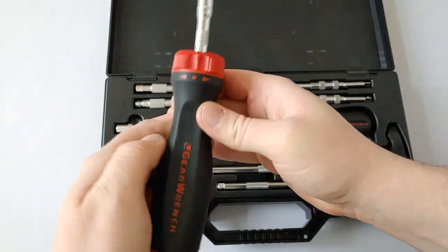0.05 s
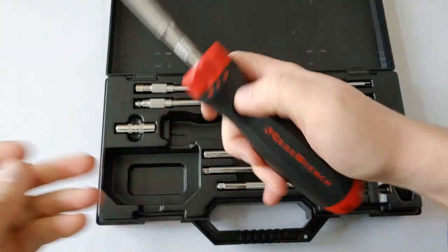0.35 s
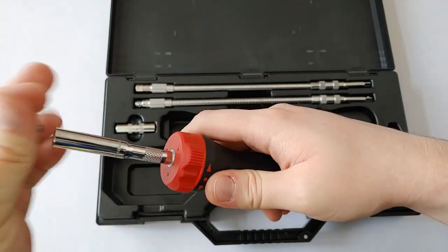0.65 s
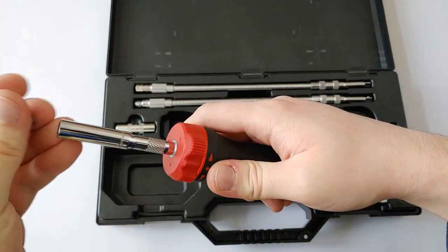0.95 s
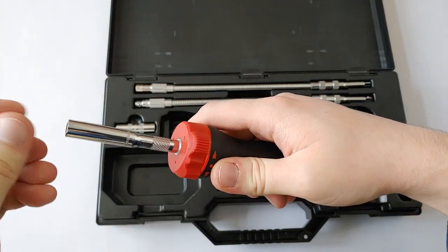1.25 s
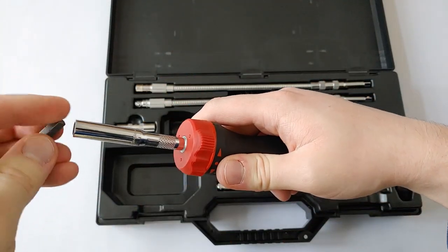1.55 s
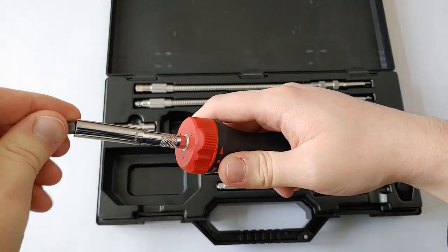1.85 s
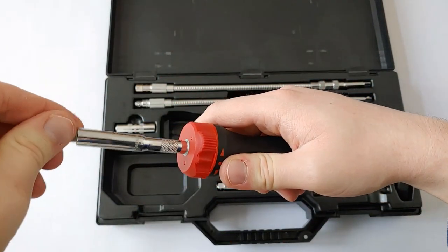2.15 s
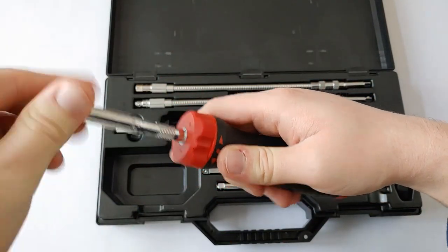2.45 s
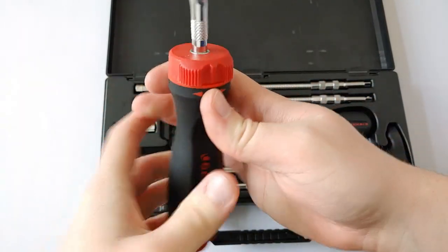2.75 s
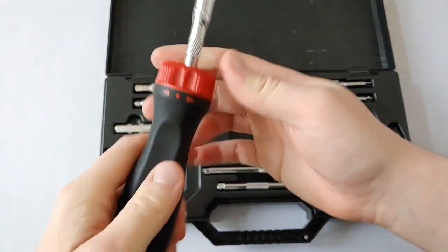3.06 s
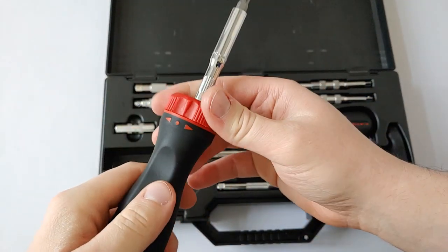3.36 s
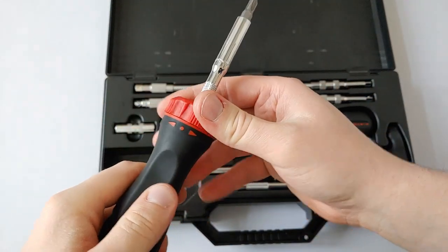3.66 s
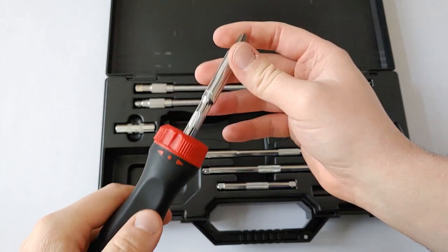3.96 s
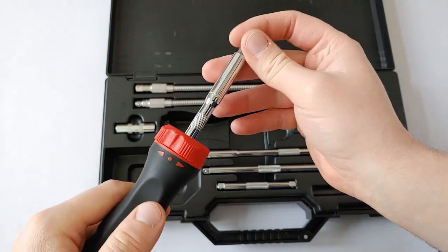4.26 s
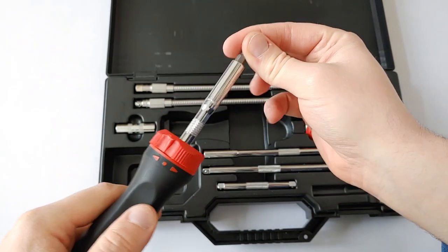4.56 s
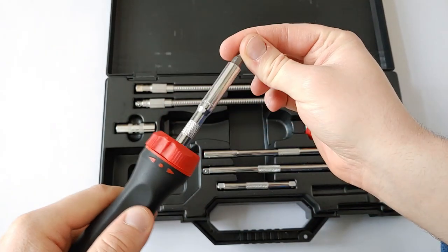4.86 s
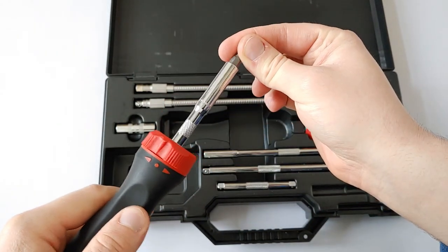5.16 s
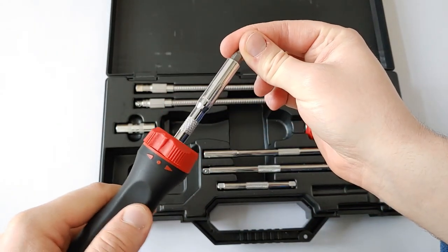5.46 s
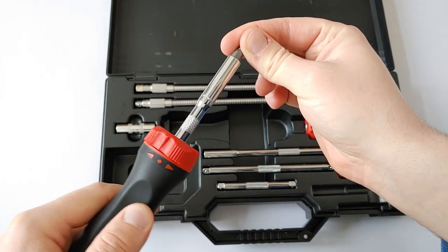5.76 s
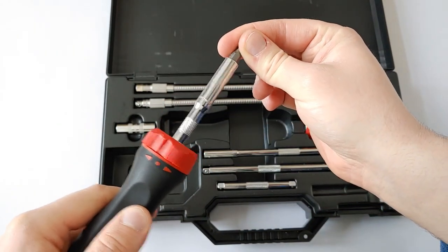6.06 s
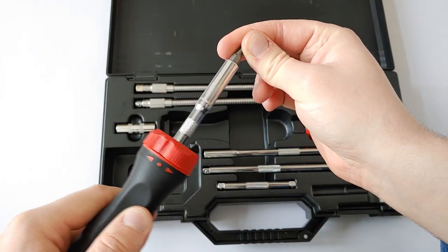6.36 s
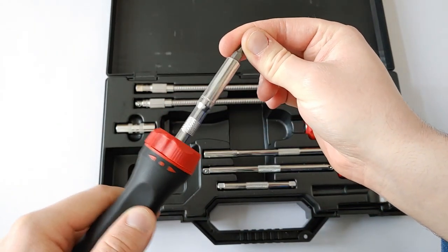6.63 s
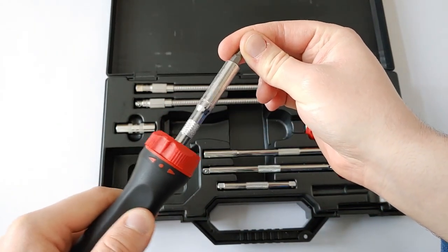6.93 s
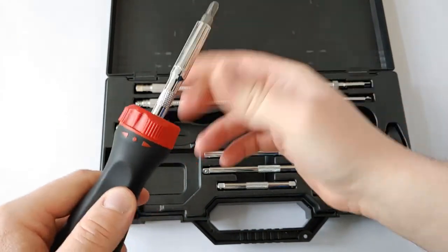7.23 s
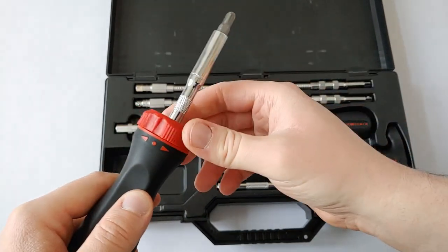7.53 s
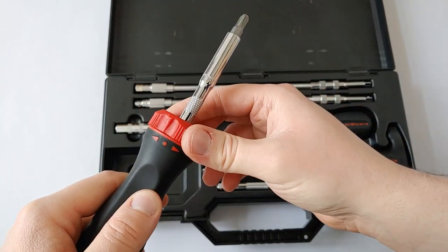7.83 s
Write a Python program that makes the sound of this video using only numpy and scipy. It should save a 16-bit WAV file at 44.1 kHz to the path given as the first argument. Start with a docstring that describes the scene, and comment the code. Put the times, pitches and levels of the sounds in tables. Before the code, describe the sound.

A ratcheting screwdriver is handled close to the microphone in a small quiet room with faint air and electrical hum. At first, fingers rub softly on the rubber handle, with a light tap. At about 0.8 seconds the steel extension clicks home with a tiny squeak. Small ticks and short gritty rasps follow from 1.8 seconds, and at 2.5 seconds a bit snaps in with a sharp, briefly ringing metallic click, the loudest sound. A dull bump comes at 3.3 seconds, and the direction collar gives a quick double click around 3.6. A fingertip taps the handle at 4.4 seconds. From about 4.6 to 7.2 seconds the wiggled shaft ticks lightly and unevenly, several times a second. Low, muffled table bumps join in between 5.4 and 7.5 seconds, then only the faint room noise remains.

```python
"""Fingers rub a rubber handle over faint room air and mains hum, close by in a small quiet room.
Steel parts of a ratcheting screwdriver tick, and its extension snaps home. Amid short rasps a bit
snaps in, the direction collar clicks over, and the wiggled shaft ticks in its play.
Each impact excites the damped modes of the tool, and rubbing is a train of tiny slips.
Dull bumps boom through the low resonances of the table."""
import sys
import numpy as np
from scipy import signal
from scipy.fft import rfft, irfft, next_fast_len
from scipy.io import wavfile
from scipy.ndimage import uniform_filter1d

SR = 44100
rng = np.random.default_rng(int(sys.argv[2]) if len(sys.argv) > 2 else 0)


def wav_record(signal):
    """Record a signal, one row per channel, as 16-bit PCM in the file named by sys.argv[1]."""
    frames = np.transpose(np.atleast_2d(signal))
    bounded = np.clip(frames, -1, 1)
    # unit amplitude maps onto the largest positive 16-bit level
    quanta = np.round(bounded * 32767).astype(np.int16)
    wavfile.write(sys.argv[1], SR, quanta)


N = 347949
TIME = np.arange(N) / SR


def from_db(db):
    """Amplitude ratio of a level in decibels."""
    return 10 ** (np.asarray(db) / 20)


def unit_rms(x):
    """Normalisation to a mean power of 1."""
    return x / np.sqrt(np.mean(x ** 2) + 1e-20)


def unit_energy(x):
    """Normalisation to a total energy of 1."""
    return x / np.sqrt(np.sum(x ** 2) + 1e-20)


def add(out, start_s, sound):
    """Superposition: a sound adds to the mix from its start time."""
    start = int(np.clip(round(start_s * SR), 0, N - 1))
    out[start:start + len(sound)] += sound[:N - start]


def coloured(x, points):
    """Spectral shaping: gain is interpolated over log frequency between (frequency_hz, gain_db) points."""
    hz, db = np.transpose(points)
    bins_hz = np.maximum(np.fft.rfftfreq(len(x), 1 / SR), 1)
    gain = from_db(np.interp(np.log(bins_hz), np.log(hz), db))
    return irfft(rfft(x) * gain, len(x))


def noise(points):
    """Stationary Gaussian noise with a shaped spectrum and an rms of 1."""
    return unit_rms(coloured(rng.standard_normal(next_fast_len(N)), points)[:N])


def lowpass(x, cutoff_hz, order):
    """Butterworth filtering: the spectrum rolls off above the cutoff."""
    return signal.sosfilt(signal.butter(order, cutoff_hz, fs=SR, output="sos"), x)


def resonate(x, hz, width_hz):
    """A damped oscillator with unit peak gain: the wider its band, the faster it decays."""
    radius = np.exp(-np.pi * width_hz / SR)
    feedback = [1, -2 * radius * np.cos(2 * np.pi * hz / SR), radius ** 2]
    return signal.lfilter(np.array([1, 0, -1]) * (1 - radius ** 2) / 2, feedback, x)


def resonant_noise(hz, width_hz):
    """Random excitation: white noise drives two equal resonators in series."""
    return resonate(resonate(rng.standard_normal(N), hz, width_hz), hz, width_hz)


def grain_bursts(bursts, spectrum, grains_per_s, spread_db, taper):
    """Shot noise: tiny impulses of uneven size at random moments, under each burst's envelope."""
    envelope = np.zeros(N)
    for start_s, length_s, level_db in bursts:
        window = signal.windows.tukey(max(int(length_s * SR), 2), taper)
        add(envelope, start_s, from_db(level_db) * window)
    size = next_fast_len(N)
    onsets = rng.random(size) < grains_per_s / SR
    grains = onsets * rng.standard_normal(size) * from_db(spread_db * rng.standard_normal(size))
    return envelope * unit_rms(coloured(grains, spectrum)[:N])


# Spectra of room air and of microphone hiss: frequency_hz, relative_density_db
AIR_SPECTRUM = [(20, -6), (60, 0), (100, -5), (250, -13), (700, -19), (1500, -22), (2300, -20), (3500, -29),
                (5400, -37), (7700, -43), (9500, -36), (11000, -41), (16000, -50)]
HISS_SPECTRUM = [(10700, -38), (11500, -17), (12200, -5), (14000, -6), (15650, -6.5), (15950, -31.5)]


def background(air_db=-66.5, hiss_db=-73.5, hum_hz=120.8, hum_db=-69, port_db=-88):
    """The noise floor: broadband air and hiss, a mains tone and the resonance of the microphone port."""
    port = from_db(port_db) * unit_rms(resonant_noise(hz=6620, width_hz=800))
    hum = from_db(hum_db) * np.sqrt(2) * np.sin(2 * np.pi * hum_hz * TIME)
    air = from_db(air_db) * noise(AIR_SPECTRUM)
    hiss = from_db(hiss_db) * noise(HISS_SPECTRUM)
    return air + hiss + hum + port


# Fingers shifting on the handle: start_s, length_s, level_db
GRIP_RUBS = [(0, 0.077, -63), (0.244, 0.55, -68.5), (2.676, 0.14, -73.5), (3.081, 0.073, -67)]
# Spectrum of skin on rubber: frequency_hz, relative_density_db
GRIP_SPECTRUM = [(300, 8), (1000, 5.5), (2400, 9.5), (4000, 1), (5400, -4), (6600, 6), (7800, -7),
                 (9500, -3), (15000, -53)]


def grip_rubs():
    """Friction of skin on rubber: dense slips merge into a rustle that swells and fades."""
    return grain_bursts(GRIP_RUBS, GRIP_SPECTRUM, grains_per_s=16000, spread_db=5, taper=1)


# Soft blows on the table: start_s, swell_s, level_db, firmness_db
TABLE_BUMPS = [(.04, 0.077, -63, 4), (3.339, 0.062, -45, 22), (5.363, 0.051, -41, 15.5),
               (5.926, 0.052, -40.5, -2.5), (6.375, 0.083, -48.5, 12), (6.458, 0.052, -39, 3.5),
               (6.98, .045, -32.5, -7), (7.453, 0.055, -37, -2)]
# Bands of crowded table modes: centre_hz, width_hz, swell_ratio, gain_db, gain_db_per_firmness_db
TABLE_BANDS = [(24, 14.4, 2.5, -5.5, 0.0435), (45.75, 23, 1.56, 2, 0.233), (83.2, 49.6, 0.73, -11.5, 1.0),
               (287, 480, 1.59, -28, 0.3457)]


def table_bumps(top_widths=1.93, ceiling_hz=397):
    """Modal overlap: crowded modes boom as bands of noise; a firmer blow favours the higher bands."""
    out = np.zeros(N)
    for hz, width_hz, swell_ratio, band_db, firmness_slope in TABLE_BANDS:
        top_hz = min(hz + top_widths * width_hz, ceiling_hz)   # a padded blow has no treble
        vibration = lowpass(resonant_noise(hz, width_hz), top_hz, order=8)
        running_rms = np.sqrt(np.abs(uniform_filter1d(vibration ** 2, size=3000)) + 1e-20)
        power = np.zeros(N)
        for start_s, swell_s, level_db, firmness_db in TABLE_BUMPS:
            age = TIME[:SR] / (swell_s * swell_ratio)
            peak = from_db(level_db + band_db + firmness_slope * firmness_db)
            add(power, start_s, (peak * age * np.exp(1 - age)) ** 2)
        out += vibration / running_rms * np.sqrt(power)
    return out


# Modes of the tool in five ascending ranges: pitch_hz, width_hz, relative_db
LOW_MODES = [(834, 1000, -7.5), (1320, 270, -7), (1764, 500, -5.5), (2045, 460, -2.5), (2444, 320, -2.5)]
MIDDLE_MODES = [(3178, 200, -3.5), (3620, 140, -5), (3900, 550, -3), (4540, 76, -12.5), (4850, 240, -12.5)]
BRIGHT_MODES = [(5700, 350, -20.5), (6287, 450, -4), (6460, 490, 5.5), (7110, 300, -14)]
TOP_MODES = [(8560, 710, -2.5), (9030, 700, -3), (9850, 540, -9.5)]
CRACK_MODES = [(11900, 710, -6.5), (14100, 2000, -13.5)]
# Passband of each range: lower_hz, upper_hz
RANGE_EDGES = [(680, 2800), (2500, 5400), (5600, 7500), (7600, 10800), (11500, 16000)]


def tool_impact(range_db, chatter, chatter_s, loss_factor=0, vary_db=0, detune=0):
    """Modal response to an impulse and brief chatter; grip and contact point can vary the modes."""
    t = TIME[:SR // 20]
    force = chatter * unit_energy(rng.standard_normal(len(t)) * t * np.exp(-t / chatter_s))
    force[0] += 1
    out = 0
    ranges = (LOW_MODES, MIDDLE_MODES, BRIGHT_MODES, TOP_MODES, CRACK_MODES)
    for modes, edges_hz, level_db in zip(ranges, RANGE_EDGES, range_db):
        ring = 0
        for k, (hz, width_hz, mode_db) in enumerate(modes):
            mode = resonate(force, hz * (1 + detune * rng.normal()), width_hz + loss_factor * hz)
            polarity = (-1) ** k   # neighbouring modes swing opposite ways
            ring += polarity * from_db(mode_db + vary_db * rng.normal()) * unit_energy(mode)
        ring = signal.sosfilt(signal.butter(2, edges_hz, "band", fs=SR, output="sos"), ring)
        out += from_db(level_db) * unit_energy(ring)
    return out


# Light contacts of bit, shaft and pawl: start_s, relative_db, hardness_db, rebound_delay_s
LIGHT_CONTACTS = [(0.1401, -62, -2.5, .002), (.412, -61, 10, .002), (.8195, -52, -3, .002),
                  (1.7724, -46.5, -2, .004), (1.787, -48.5, 1.5, .002), (1.854, -61.5, 2.5, .009),
                  (1.891, -60, 1, .0056), (1.941, -60, -2.5, .002), (2.153, -69.5, -5, .002),
                  (2.3023, -64, -12, .003), (2.321, -46.5, 1, .004), (2.393, -63, 4, .002),
                  (2.433, -59, -6.5, .002), (3.467, -62, -3, .002), (3.5114, -67, 12, .002),
                  (3.746, -58.5, 3.5, .002), (4.596, -51.5, 6, .011), (4.724, -53.5, -6, .002),
                  (4.7307, -50, 1.5, .002), (4.8783, -46.5, -9.5, .002), (5.009, -59, -5.5, .002),
                  (5.123, -54.5, -7, .011), (5.264, -63, 0.5, .002), (5.3849, -53.5, -6, .002),
                  (5.5216, -53, 0, .002), (5.638, -54.5, -12, .013), (5.7636, -49, -2.5, .002),
                  (5.9357, -53, 8.5, .002), (6.0225, -63, -1, .002), (6.0453, -51, -1, .002),
                  (6.2138, -49.5, -2.5, .0126), (6.3344, -58, -2, .002), (6.3447, -51.5, -1, .002),
                  (6.4976, -55.5, 0.5, .002), (6.6182, -46, -1, .0035), (6.772, -50, 1, .0084),
                  (6.91, -44.5, -2.5, .0054), (7.049, -59.5, -10.5, .025), (7.1622, -45.5, -3.5, .004)]
# Spans in which the tool is moved about: start_s, end_s
RATTLE_SPANS = [(0, .6), (1.85, 2.3), (2.65, 3.0)]


def contacts(rebound_db=-6, rattles_per_s=3.1, rattle_db=-66, spread_db=3):
    """Elastic rebound doubles each listed contact; loose parts also rattle at random as the tool moves."""
    for start_s, level_db, hardness_db, rebound_delay_s in LIGHT_CONTACTS:
        yield start_s, level_db, hardness_db
        yield start_s + rebound_delay_s, level_db + rebound_db, hardness_db
    for start_s, end_s in RATTLE_SPANS:
        for slot_s in np.arange(start_s, end_s, 1 / rattles_per_s):
            yield slot_s + rng.random() / rattles_per_s, rattle_db + spread_db * rng.normal(), 0


# Response of each range to a light contact: offset_db, gain_db_per_hardness_db
CONTACT_RESPONSE = [(1, -0.16), (1, 0.11), (0.5, 1.19), (-8.5, .5), (-14.5, .5)]
# Modes of the extension: pitch_hz, width_hz, gain_db
EXTENSION_MODES = [(2102, 39, 1.5), (2307, 35, -5.5), (3040, 50, -4), (3740, 35, -5.5), (3877, 60, -4),
                   (6630, 640, -6.5)]


def ticks(gain_db=21, slide_db=-14, slide_s=0.01, ring_db=3.0, held_s=(4.5, 7.3), held_db=-7):
    """Backlash: parts slide across their play, collide and ring the extension; harder is brighter."""
    out = np.zeros(N)
    t = TIME[:SR // 25]
    offset_db, hardness_slope = np.transpose(CONTACT_RESPONSE)
    for start_s, level_db, hardness_db in contacts():
        range_db = level_db + offset_db + hardness_slope * hardness_db
        if held_s[0] < start_s < held_s[1]:
            range_db[-2:] += held_db   # fingers wiggling the bit damp the two highest ranges
        tick = tool_impact(range_db, chatter=1.3, chatter_s=0.00081, vary_db=4.0, detune=.002)
        slide = unit_energy(rng.standard_normal(len(t)) * np.exp((t - t[-1]) / slide_s))
        add(out, start_s - t[-1], from_db(slide_db) * signal.fftconvolve(slide, tick))
        add(out, start_s, tick)
    extension = sum(from_db(db) * resonate(out, hz, width_hz) for hz, width_hz, db in EXTENSION_MODES)
    return from_db(gain_db) * (out + from_db(ring_db) * extension)


# Fingertips landing on the handle: start_s, energy_db
FINGER_TAPS = [(.412, -29.5), (3.202, -47), (4.3961, -24.5)]
# Modes of the handle: pitch_hz, width_hz, relative_db
HANDLE_MODES = [(840, 2100, 3.5), (1400, 170, 8), (1890, 480, 6), (2380, 1800, 7.5)]


def finger_taps(cutoff_hz=2600):
    """Compliant contact: a soft fingertip spreads its force in time and excites only low modes."""
    out = np.zeros(N)
    force = lowpass(signal.unit_impulse(SR // 20), cutoff_hz, order=4)
    ring = 0
    for k, (hz, width_hz, mode_db) in enumerate(HANDLE_MODES):
        ring += (-1) ** k * from_db(mode_db) * resonate(force, hz, width_hz)
    for start_s, energy_db in FINGER_TAPS:
        add(out, start_s, from_db(energy_db) * unit_energy(ring))
    return out


# Steel squeaking on steel: start_s, length_s, pitch_hz, level_db
STEEL_SQUEAKS = [(0.809, 0.043, 4650, -64), (1.849, 0.014, 4380, -60.5)]


def squeaks(width_hz=90):
    """Stick-slip friction briefly drives one narrow resonance."""
    out = np.zeros(N)
    for start_s, length_s, pitch_hz, level_db in STEEL_SQUEAKS:
        size = max(int(length_s * SR), 8)
        squeak = unit_rms(resonate(rng.standard_normal(size), pitch_hz, width_hz))
        add(out, start_s, from_db(level_db) * squeak * signal.windows.tukey(size, .5))
    return out


# Modes of the steel shaft: pitch_hz, relative_db, t60_s
SHAFT_MODES = [(1800, 15.5, 0.01142), (3382, 21, 0.019), (2066, 2, 0.12), (3405, -16, .22), (4360, -13, .2),
               (5060, -14, 0.19), (6400, 3.5, 0.24), (7115, -8.5, 0.237), (8306, -13.5, .18),
               (9800, -12, 0.19), (9620, -6.5, .16), (10000, -14.5, .16)]


def shaft_ring(swell_s=0.001):
    """Free vibration after a blow: strong bending modes die quickly and leave a faint, longer ring."""
    t = TIME[:SR // 3]
    ring = sum(from_db(db - 60 * t / t60_s) * np.sin(2 * np.pi * hz * t) for hz, db, t60_s in SHAFT_MODES)
    return unit_energy(ring * (1 - np.exp(-t / swell_s)))


# The extension, the bit and twice the collar snapping home: start_s, relative_db, ping_hz,
# then offsets from that level: ping_db, low_db, middle_db, bright_db, top_db, crack_db
SPRUNG_SNAPS = [(0.8191, -39, 1970, -9, -27, -26, -9, -17, -24),
                (2.508, -13.5, 2095, -15.5, -22, -17.5, -9.5, -18, -30),
                (3.5562, -28.5, 3840, -15.5, -25.5, -16, -12, -17, -19),
                (3.5887, -21, 3880, -16.5, -29.5, -17.5, -10, -17, -20)]


def snaps(gain_db=27.0, ping_t60_s=.02, knock_db=-11, ring_db=-6):
    """Impulsive excitation: a sprung part seats and pings, the handle knocks and the shaft rings on."""
    out = np.zeros(N)
    t = TIME[:SR // 20]
    knock = resonate(signal.unit_impulse(len(t)), hz=320, width_hz=1100)
    knock = unit_energy(lowpass(knock, cutoff_hz=2500, order=2))
    for start_s, level_db, ping_hz, ping_db, *offsets_db in SPRUNG_SNAPS:
        range_db = level_db + np.array(offsets_db)
        ping = unit_energy(np.sin(2 * np.pi * ping_hz * t) * from_db(-60 * t / ping_t60_s))
        add(out, start_s, tool_impact(range_db, chatter=.2, chatter_s=.0004, loss_factor=.03))
        add(out, start_s, from_db(level_db + ping_db) * ping)
        add(out, start_s, from_db(range_db[0] + knock_db) * knock)
        add(out, start_s, from_db(range_db[0] + ring_db) * shaft_ring())
    return from_db(gain_db) * out


# Short gritty rasps, and a faint rush of noise just before the loud snap: start_s, length_s, level_db
RASPS = [(1.770, .014, -48), (1.845, .07, -66), (2.42, .08, -64), (2.497, .009, -47), (2.5035, .005, -35),
         (3.552, .014, -48), (3.583, .006, -42), (6.89, .02, -61)]
# Their spectrum: frequency_hz, relative_density_db
RASP_SPECTRUM = [(300, -42), (1100, -23.5), (1900, -1.5), (3300, -14.5), (5400, -15), (6600, -9.5),
                 (7800, -30.5), (10500, -38.5), (15000, -27.5)]


def rasps():
    """Sparse shot noise: short gritty rasps, and a faint rush just before the loud snap."""
    return grain_bursts(RASPS, RASP_SPECTRUM, grains_per_s=3000, spread_db=3, taper=.5)


# Spectrum of the room's reflections: frequency_hz, relative_db
ROOM_SPECTRUM = [(150, -7.5), (900, -12), (2100, 2), (3500, 0), (5200, -4), (6700, 0), (9500, -4),
                 (12000, -12.5), (16000, -14)]


def room(x, build_s=0.0063, t60_s=0.206):
    """Reverberation: dense reflections build up within milliseconds and decay exponentially."""
    t = TIME[:SR // 2]
    reflections = coloured(rng.standard_normal(len(t)), ROOM_SPECTRUM)
    envelope = from_db(-60 * t / t60_s) * (1 - np.exp(-(t / build_s) ** 2))
    return signal.fftconvolve(x, unit_energy(reflections * envelope))[:N]


def scene(light_room_db=-14, hard_room_db=-16):
    """Superposition of the tool's direct sound, its reflections, the table and the noise floor."""
    light = ticks() + rasps() + squeaks() + finger_taps() + grip_rubs()
    hard = snaps()
    reflections = room(from_db(hard_room_db) * hard + from_db(light_room_db) * light)
    return (light + hard + reflections + table_bumps() + background())[None]


def record(dry, cutoff_hz=16200):
    """Band limiting: a steep elliptic low-pass filter removes the highest treble."""
    return signal.sosfilt(signal.ellip(10, .1, 80, cutoff_hz, fs=SR, output="sos"), dry)


dry = scene()
out = record(dry)
wav_record(out)
```